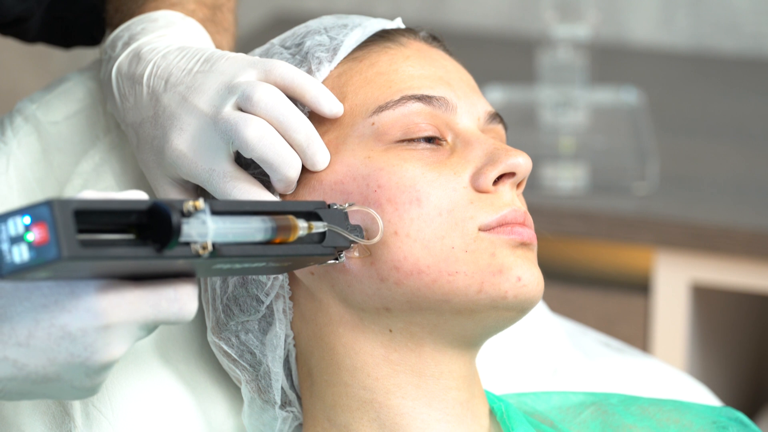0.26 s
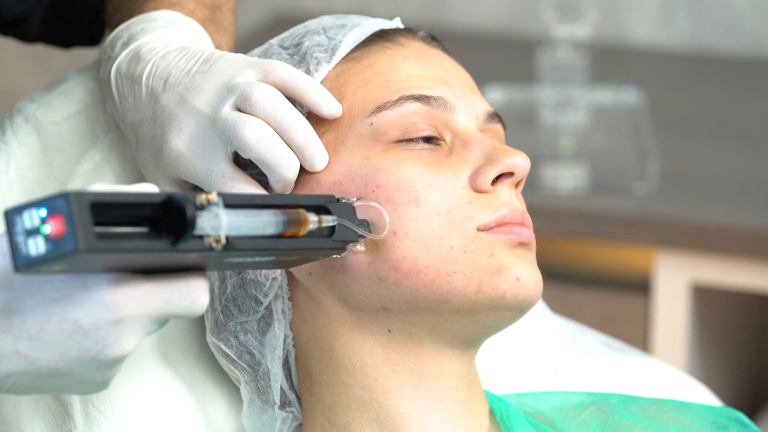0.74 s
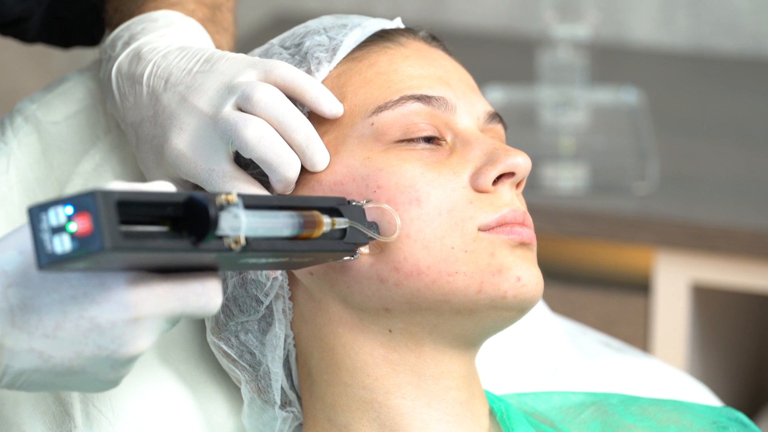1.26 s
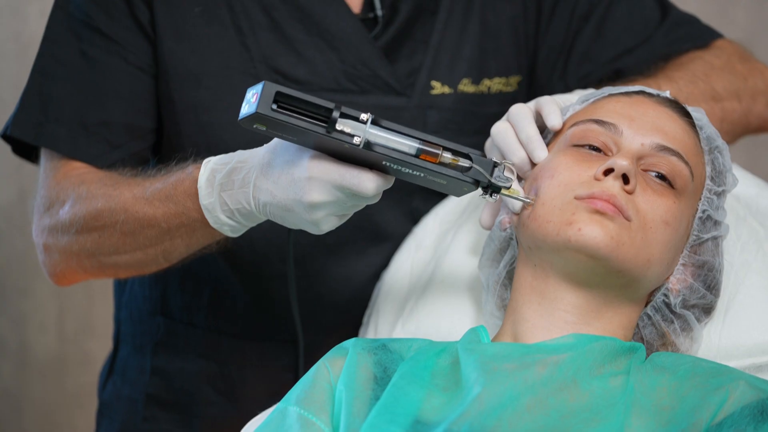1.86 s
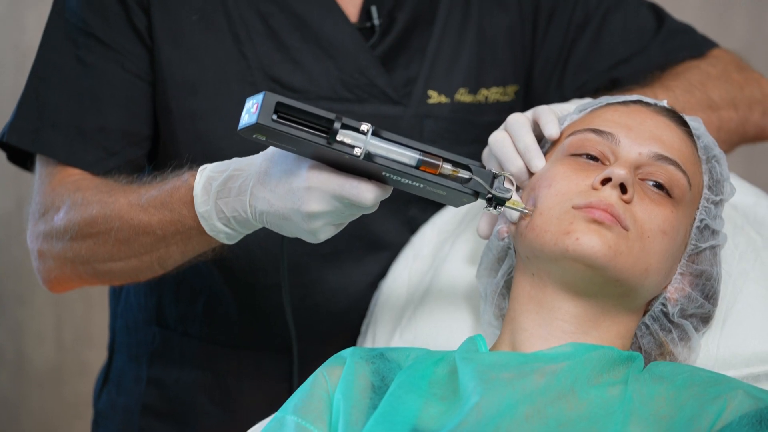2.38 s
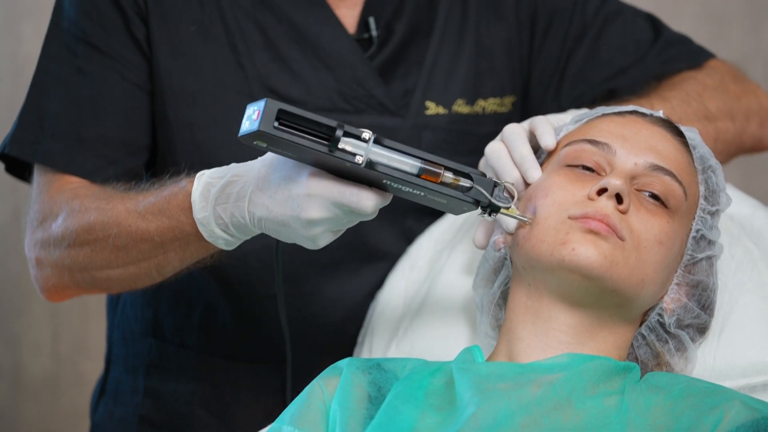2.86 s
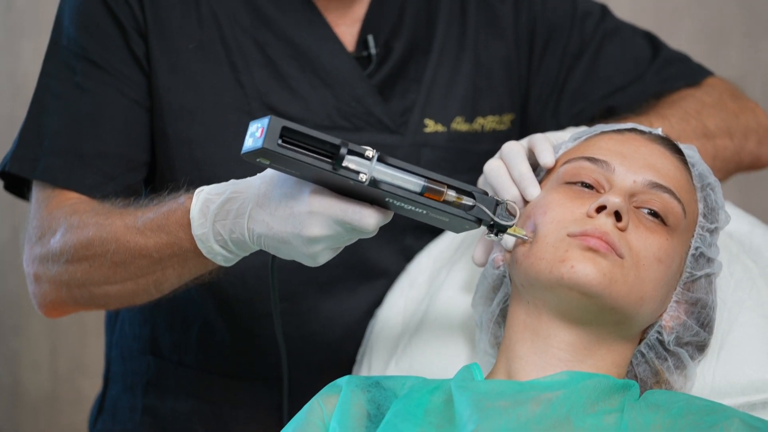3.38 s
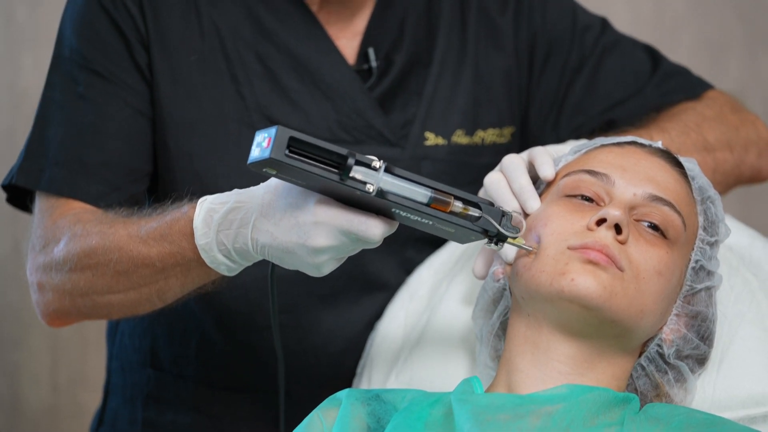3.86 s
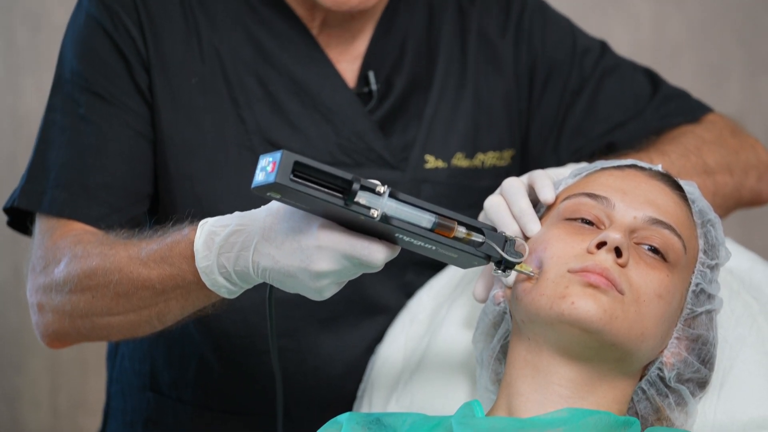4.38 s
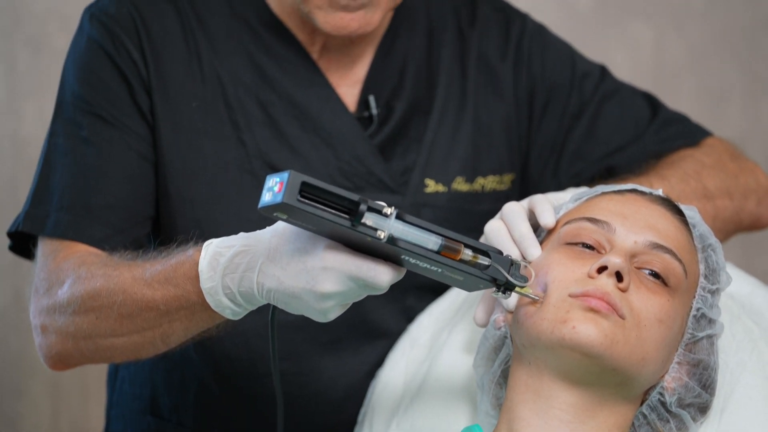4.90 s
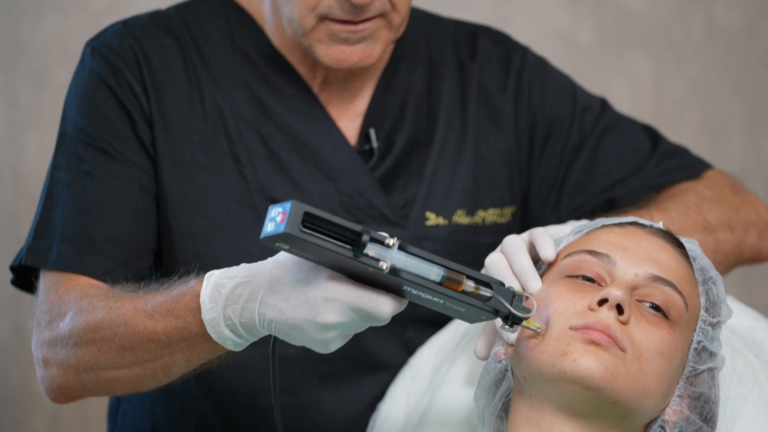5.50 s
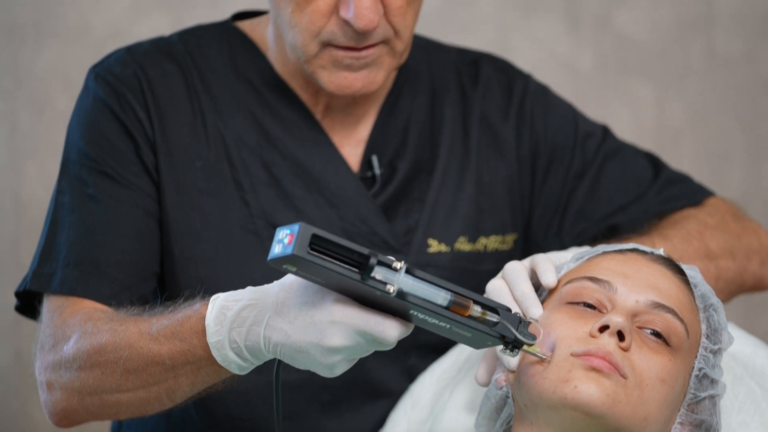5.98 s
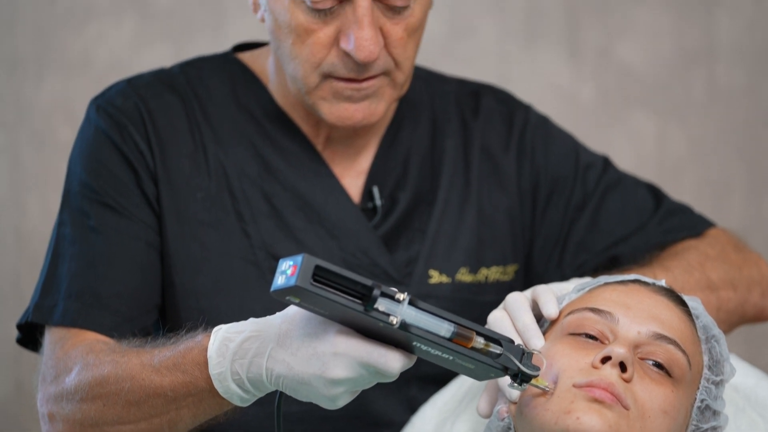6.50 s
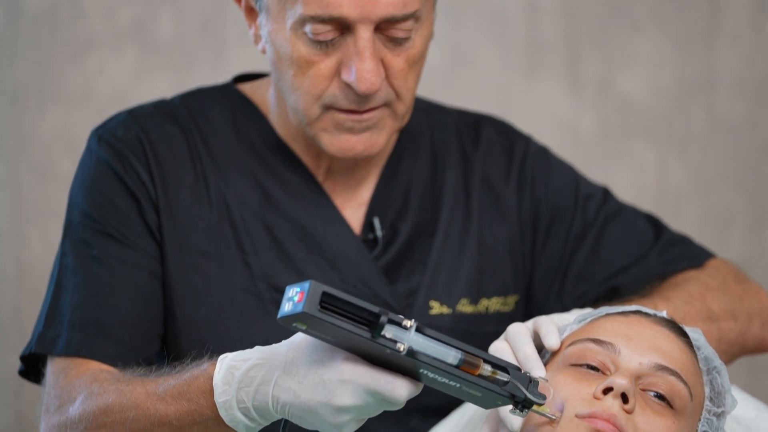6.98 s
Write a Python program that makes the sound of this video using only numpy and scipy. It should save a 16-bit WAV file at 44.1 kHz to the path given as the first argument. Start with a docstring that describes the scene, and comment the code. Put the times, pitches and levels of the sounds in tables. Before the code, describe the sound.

In a quiet, hard-walled clinic room, an automatic injector gun clicks steadily at close range. Its carriage clacks forward, a small motor whines and whirrs softly, then the carriage snaps back with a tiny rattle. After a short pause the pattern repeats, seven times in all, over faint room noise and a slight low rumble from the grip.

```python
"""Injector gun in a quiet treatment room.

A handheld gun, close to one microphone, cycles about once a second. The needle carriage clacks forward
and its spring rings; a small motor feeds the syringe under the thin whine of its drive; the carriage
snaps back and bounces on its stop. Hard walls answer, over faint room noise and the rumble of the grip."""
import sys
import numpy as np
from scipy import signal
from scipy.fft import rfft, irfft, next_fast_len
from scipy.io import wavfile

SR = 44100
rng = np.random.default_rng(int(sys.argv[2]) if len(sys.argv) > 2 else 0)


def wav_record(signal):
    """Record a signal, one row per channel, as 16-bit PCM in the file named by sys.argv[1]."""
    frames = np.transpose(np.atleast_2d(signal))
    bounded = np.clip(frames, -1, 1)
    # unit amplitude maps onto the largest positive 16-bit level
    quanta = np.round(bounded * 32767).astype(np.int16)
    wavfile.write(sys.argv[1], SR, quanta)


N = 319284

# Forward throws of the carriage, each starting a feed. Each row: start in seconds, then in dB the gains
# of the clack, spring and latch, the whine's level and the depth of its mid-stroke dip.
PUSHES = [(0.0855, -1, 0, -34.5, -48, 4), (1.1106, -1, -2.5, -21.5, -45, 3),
          (2.1337, -0.5, -2.5, -32.5, -46.5, 3), (3.1590, -1, -3, -31, -45, 23.5),
          (4.1834, -1.5, -3.5, -27.5, -45.3, 4.5), (5.2075, -1, -4.5, -34.5, -48.5, 4),
          (6.2317, -1, -4, -44, -46.5, 7)]


def gain_of(db):
    """Decibels to a factor."""
    return 10 ** (np.asarray(db) / 20)


def read(points, hz):
    """Reads a table on a log-frequency axis."""
    f, value = np.transpose(points)
    return np.interp(np.log(hz + 1), np.log(f + 1), value)


def clock(length):
    """Sample times over a length in seconds."""
    return np.arange(int(length * SR)) / SR


def decay(t, t60):
    """A fall of 60 dB every t60 seconds."""
    return np.exp(-np.log(1000) * t / t60)


def hump(t, at_s, width_s):
    """A smooth rise to one and back."""
    return np.exp(-((t - at_s) / width_s) ** 2)


def add(mix, s, sound):
    """Mixes a sound in at s seconds."""
    part = mix[max(round(s * SR), 0):][:len(sound)]
    part += sound[:len(part)]


def noise(spectrum, size):
    """Noise of rms about one, coloured by rows of frequency in Hz and relative level in dB."""
    full = next_fast_len(max(size, 4096))
    colour = gain_of(read(spectrum, np.fft.rfftfreq(full, 1 / SR)))
    x = irfft(rfft(rng.standard_normal(full)) * colour, full)
    return x[:size] / np.sqrt(np.mean(x ** 2) + 1e-20)


def wander(rate_hz, size):
    """Random drift around zero."""
    knots = rng.standard_normal(64)
    return np.interp(np.arange(size) / SR * rate_hz, np.arange(len(knots)), knots)


def air(level_db=-70.5, swell_db=1):
    """Quiet room noise that swells slightly."""
    # The still room. Each row: frequency in Hz, relative level in dB.
    spectrum = [(20, -5.5), (50, -7.5), (100, -13), (200, -32), (300, -27), (400, -18), (500, 3.5),
                (650, -4), (800, -4), (1500, -8), (3000, -15), (7000, -20.5), (13900, -26.5),
                (14800, -49.5)]
    return gain_of(level_db + swell_db * wander(2.9, N)) * noise(spectrum, N)


def handling(rest_db=-94, unsteady_db=5):
    """Deep uneven rumble that swells when the grip shifts, and a few soft bumps."""
    # Shifts of the hand. Each row: peak time in seconds, half width in seconds, rumble in dB.
    grips = [(.26, 0.3, -68), (1.857, .15, -73.5), (2.8, 0.13, -65), (3.55, 0.22, -71), (4.58, .13, -61),
             (7.11, 0.064, -62.5)]
    # Low bumps. Each row: start in seconds, length in seconds, pitch in Hz, level in dB.
    bumps = [(1.003, 0.12, 271, -68.5), (2.24, 0.3, 187.4, -75), (3.065, 0.14, 147, -73),
             (5.2, 0.193, 184.7, -72.5)]
    t = np.arange(N) / SR
    resting = gain_of(rest_db + unsteady_db * wander(5, N))
    shifting = sum(gain_of(db) * hump(t, s, width) for s, width, db in grips)
    rumble = noise([(8, -19.5), (20, 6), (36, -11), (55, -14.5), (90, -20.5), (200, -42.5),
                    (1000, -100)], N)
    out = (resting + shifting) * rumble
    for s, length, hz, db in bumps:
        size = int(length * SR)
        thud = noise([(hz / 2, -50), (.85 * hz, -8), (hz, 0), (1.15 * hz, -8), (2 * hz, -80)], size)
        add(out, s, gain_of(db) * thud * signal.windows.tukey(size, .7))
    return out


def blow(stop, ring_db, crack_spectrum, crack_db, crack_t60, scatter_db, detune):
    """One contact at the front (0) or rear (1) stop: the body's modes ring under a short crack."""
    # Modes of the gun body. Each row: frequency in Hz, t60 in seconds, relative level in dB when
    # struck at the front stop, the same at the rear stop.
    body = [(315, .05, -39, -49), (474.7, 0.036, -25.5, -27), (582.7, 0.032, -20, -23),
            (713, 0.058, -25.5, -28.5), (845, 0.034, -35.5, -27), (956, 0.062, -41, -25),
            (1167, 0.043, -27.5, -41.5), (1264, 0.012, -22, -27), (1490, 0.041, -24.5, -22),
            (1636, 0.057, -39.5, -24), (1732, 0.035, -22.5, -23), (1905, 0.036, -24.5, -23.5),
            (2070, 0.011, -24, -27), (2320, 0.031, -28, -45), (2500, 0.016, -23.5, -20.5),
            (2825, 0.03, -27, -26.5), (3300, 0.02, -32, -28), (3320, 0.018, -25, -26.5),
            (4170, .012, -27, -16), (4620, 0.0072, -11, -37.5), (5040, 0.023, -20.5, -36),
            (5680, 0.011, -30.5, -49), (5645, 0.0084, -14.5, -17.5)]
    t = clock(.06)
    hz, t60, *strike_db = np.transpose(body)[:, :, None]
    pitch, level = rng.standard_normal((2, len(body), 1))  # the grip changes a little from blow to blow
    sign = (-1) ** np.arange(len(body))[:, None]  # neighbouring modes swing in opposite directions
    strength = sign * gain_of(strike_db[stop] + scatter_db * level)
    modes = strength * np.sin(2 * np.pi * hz * (1 + detune * pitch) * t)
    ring = gain_of(ring_db) * (modes * decay(t, t60)).sum(0)
    crack = gain_of(crack_db) * noise(crack_spectrum, len(t)) * decay(t, crack_t60)
    attack = 1 - np.exp(-t / .00095)
    return (ring + crack) * attack


def forward_clacks(ring_db, latch_s=.0059):
    """The latch lets go, then the carriage hits the front stop and sets its spring ringing."""
    # The dull crack at the front. Each row: frequency in Hz, relative level in dB.
    crack = [(100, -27.5), (250, -15), (500, -12), (1500, 0), (5000, -5), (6300, -8.5), (7500, -19.5),
             (10000, -21), (11800, -16), (14000, -29), (16000, -53.5)]
    out = np.zeros(N)
    for s, db, spring_db, latch_db, *_ in PUSHES:
        latch = blow(0, ring_db, crack, crack_db=-22, crack_t60=.022, scatter_db=6.5, detune=.013)
        clack = blow(0, ring_db, crack, crack_db=-12.5, crack_t60=.014, scatter_db=2.5, detune=.005)
        add(out, s - latch_s, gain_of(latch_db) * latch)
        add(out, s, gain_of(db) * clack)
        add(out, s, gain_of(spring_db) * spring())
    return out


def spring(hz=3400, width_hz=175, t60=.32, flutter_hz=46, depth=.18):
    """The spring's cluster of close modes rings on, throbbing as the coils swing."""
    t = clock(.4)
    cluster = noise([(hz - 3 * width_hz, -60), (hz - width_hz, -4), (hz, 0),
                     (hz + width_hz, -4), (hz + 2 * width_hz, -60)], len(t))
    throb = 1 + depth * np.cos(2 * np.pi * flutter_hz * t)
    return gain_of(-35) * cluster * throb * decay(t, t60)


def feeding(t, feed_s=.385, run_down_s=.035):
    """One while the motor feeds, falling to zero as it runs down; t counts from the push."""
    return np.clip(1 - (t - feed_s) / run_down_s, 0, 1)


def gears(fade_db_per_s=41.5, turn_hz=18.8, grain_db=2.5, rough=.65, jitter=.048):
    """The feed gears on each stroke: a fading grainy whirr, raspy sliding tones and two ticks."""
    # The whirr. Each row: frequency in Hz, relative level in dB.
    whirr = [(150, -44.5), (350, -18), (500, -5), (1100, 0.5), (1550, 5), (2400, -2.5), (3600, -3.5),
             (5600, -3), (7000, -14), (10500, -18.5), (14000, -31.5), (16000, -47.5)]
    # Gear tones sliding as the motor changes speed. Each row: seconds after the push, length in
    # seconds, first and last pitch in Hz, relative level in dB.
    glides = [(.066, 0.038, 1445, 1586, -48), (0.136, 0.046, 1440, 1651, -46.5),
              (0.15, .045, 922, 1520, -50.5), (0.2, .045, 1393, 2358, -45), (.225, 0.034, 1580, 1033, -58),
              (0.278, .047, 2015, 1307, -53), (.278, 0.045, 1528, 2360, -57), (.35, .05, 1607, 2206, -48.5),
              (0.355, 0.046, 1950, 1660, -56)]
    # Ticks in the gear. Each row: seconds after the push, pitch in Hz, ring in dB, scrape in dB.
    ticks = [(.095, 1490, -33.5, -43.5), (.203, 1438, -40.5, -48.5)]
    scrape_spectrum = [(1000, -21.5), (4500, -8.5), (5900, 2), (7500, -19.5), (12000, -20), (15000, -44)]
    out, t = np.zeros(N), clock(.51)
    surge_db = np.cos(2 * np.pi * turn_hz * t)  # once each turn of the gear
    run_down_db = -10.5 * (1 - feeding(t))
    whirr_db = -43 - fade_db_per_s * t + surge_db + run_down_db
    for s, *_ in PUSHES:
        grit = gain_of(grain_db * wander(120, len(t)))  # the teeth mesh unevenly
        add(out, s, noise(whirr, len(t)) * grit * gain_of(whirr_db))
        for delay, length, from_hz, to_hz, db in glides:
            size = int(length * SR)
            speed, level = rng.standard_normal(2)
            hz = np.linspace(from_hz, to_hz, size) * (1 + .015 * speed + jitter * wander(700, size))
            rasp = 1 + rough * wander(400, size)
            tone = np.sqrt(2) * np.sin(2 * np.pi * np.cumsum(hz) / SR) * rasp
            add(out, s + delay, gain_of(db - 3.5 + level) * tone * signal.windows.tukey(size, .5))
        for delay, hz, ring_db, scrape_db in ticks:
            ring = gain_of(ring_db) * np.sin(2 * np.pi * hz * t) * hump(t, delay, .0027)
            scrape = gain_of(scrape_db) * noise(scrape_spectrum, len(t)) * hump(t, delay + .004, .0067)
            add(out, s, ring + scrape)
    return out


def whine(hz=1917.3, on_s=.044, off_s=.503, swell_s=.041, unsteady_db=3):
    """The drive chops the motor current in a near-square wave; load skews it, raising partial two."""
    # Upper partials. Each row: multiple of the pitch, idle level in dB, waver while feeding in dB.
    partials = [(2, -75.5, 4.5), (3, -64, 3), (4, -87, 3.5), (5, -88.5, 2.5), (6, -90.5, 3.5)]
    out, t = np.zeros(N), on_s + clock(off_s - on_s)
    angle, moving = 2 * np.pi * hz * t, feeding(t)
    swell_db = -14 * np.exp(-(t - on_s) / swell_s)
    dip = hump(t, at_s=.295, width_s=.047)
    load_db = 10 * moving + 8.5 * hump(t, at_s=.21, width_s=.027)  # greatest at one stiff spot
    shake = .3 + .7 * moving  # the tone steadies once the motor rests
    for s, *_, db, dip_db in PUSHES:
        drift_db = unsteady_db * shake * wander(26, len(t))
        tone = gain_of(db + swell_db - dip_db * dip + drift_db) * np.sin(angle)
        for multiple, idle_db, waver_db in partials:
            lift_db = load_db if multiple == 2 else 1.5 * moving
            partial_db = idle_db + lift_db + waver_db * shake * wander(39, len(t))
            tone += gain_of(partial_db) * np.sin(multiple * angle)
        add(out, s + on_s, np.sqrt(2) * tone * signal.windows.tukey(len(t), .02))
    return out


def return_snaps(ring_db, detune, bounce_s=.0103, ping_hz=5170, ping_t60=.0093):
    """The carriage snaps back on its metal stop, which pings; it bounces once and rattles."""
    # Returns. Each row: time in seconds, then relative dB of the stroke, its crack, bounce and ping.
    returns = [(0.6088, -1, 5.5, -2, -13.5), (1.6322, 0, 3.5, -1, -31.5), (2.6551, 1.5, 0.5, -4.5, -36.5),
               (3.6811, 1, 1.5, -4.5, -33), (4.7057, 1, 1.5, -4, -20), (5.7305, 0, 4, -2, -25.5),
               (6.7548, 0.5, 2.5, -4, -43)]
    # The hard crack at the rear. Each row: frequency in Hz, relative level in dB.
    crack = [(100, -23), (250, -51.5), (500, -18), (1500, 11.5), (3600, 2.5), (5300, 7), (6500, -2),
             (7800, -8.5), (9000, -9), (11500, -7.5), (14800, -13), (16000, -38)]
    # Light contacts around each return. Each row: offset in seconds, relative level in dB.
    rattle = [(-.0112, -22.5), (-.0065, -18), (-.0039, -18), (0.016, -9.5)]
    out, t = np.zeros(N), clock(.05)
    ping = np.sin(2 * np.pi * ping_hz * t) * decay(t, ping_t60)
    for s, db, crack_db, bounce_db, ping_db in returns:
        snap = blow(1, ring_db, crack, crack_db - 13.5, crack_t60=.017, scatter_db=3, detune=detune)
        bounce = blow(1, ring_db, crack, crack_db=-11.5, crack_t60=.024, scatter_db=.5, detune=.019)
        add(out, s, gain_of(db - 1) * snap)
        add(out, s, gain_of(ping_db) * ping)
        add(out, s + bounce_s, gain_of(db + bounce_db - 3) * bounce)
        for delay, contact_db in rattle:
            dull_db = .27 * contact_db - 21.5  # a lighter contact is also a duller one
            contact = blow(1, ring_db, crack, dull_db, crack_t60=.038, scatter_db=3.5, detune=.039)
            add(out, s + delay, gain_of(db + contact_db) * contact)
    return out


def carriage(ring_db, snap_detune, bass_hz=210):
    """Both strokes of the carriage; so small a body radiates little bass."""
    strokes = forward_clacks(ring_db) + return_snaps(ring_db, snap_detune)
    return signal.sosfilt(signal.butter(2, bass_hz, "high", fs=SR, output="sos"), strokes)


def rustles():
    """Faint soft brushing between the clacks."""
    # Rustles. Each row: start in seconds, length in seconds, level in dB, upper edge in Hz.
    brushes = [(1.003, 0.23, -68.5, 1820), (2.01, 0.072, -63, 2220), (2.071, 0.056, -57.5, 4920),
               (2.544, .1, -55.5, 1320), (2.919, 0.176, -72, 5040), (4.542, 0.01, -60, 5070),
               (4.999, 0.059, -82, 1540)]
    out = np.zeros(N)
    for s, length, db, edge_hz in brushes:
        size = int(length * SR)
        brush = noise([(200, -30), (500, 0), (edge_hz, -3), (1.5 * edge_hz, -18), (16000, -35)], size)
        add(out, s, gain_of(db) * brush * signal.windows.tukey(size, .3))
    return out


def room(x, first_s=.0033, build_s=.0011):
    """One diffuse tail of a small hard room; the treble dies first."""
    # The room's decay. Each row: frequency in Hz, t60 in seconds.
    decay_times = [(250, 1), (660, 0.62), (1740, 0.44), (4600, 0.45), (12000, 0.34)]
    # What the walls give back. Each row: frequency in Hz, gain in dB.
    send = [(150, -9), (500, -9), (1500, -9), (3000, -7), (5000, -11), (9000, -1.5), (14000, -12)]
    hz, age, bands = signal.stft(rng.standard_normal(SR), SR, nperseg=256)
    t60 = read(decay_times, hz)[:, None]
    unit_energy = np.sqrt(2 * np.log(1000) / (t60 * SR))
    bands *= gain_of(read(send, hz))[:, None] * decay(age, t60) * unit_energy
    tail = signal.istft(bands, SR, nperseg=256)[1][:SR]
    tail *= 1 - np.exp(-np.maximum(clock(1) - first_s, 0) / build_s)
    return signal.fftconvolve(x, tail)[:N]


def standing_waves(x):
    """Low room modes hum on after each clack."""
    # Room modes. Each row: frequency in Hz, t60 in seconds, gain in dB.
    modes = [(310.2, 0.59, -65), (496.7, 0.26, -64)]
    t = clock(.5)
    hum = sum(gain_of(db) * np.cos(2 * np.pi * hz * t) * decay(t, t60) for hz, t60, db in modes)
    return signal.fftconvolve(x, hum)[:N]


def scene(walls=3):
    """The gun close up, its echoes and the still room behind, in mono."""
    clacks = carriage(ring_db=-1.5, snap_detune=.012)
    feed = gears() + rustles()
    tone = whine()
    # each wall is sent its own colour of the clacks, so the summed tail is smooth
    sends = (carriage(ring_db=-2.5, snap_detune=.035) + feed + gain_of(-12) * tone for _ in range(walls))
    echoes = sum(room(send) for send in sends) / np.sqrt(walls)
    return (clacks + feed + tone + echoes + standing_waves(clacks) + handling() + air())[None]


def record(dry, edge_hz=15700):
    """The recorder's band limit."""
    lowpass = signal.firwin(255, edge_hz, window=("kaiser", 8), fs=SR)
    return signal.oaconvolve(dry, lowpass[None], "same")


dry = scene()
out = record(dry)
wav_record(out)
```